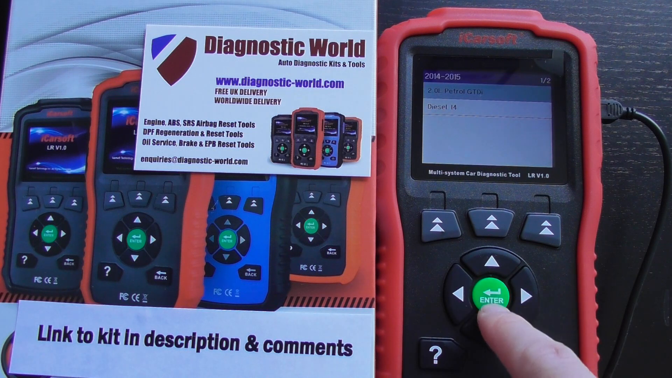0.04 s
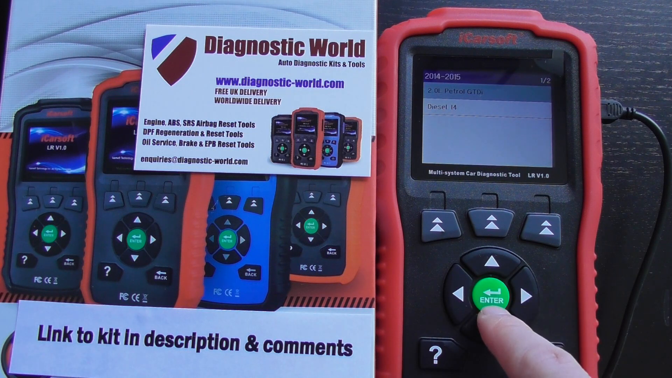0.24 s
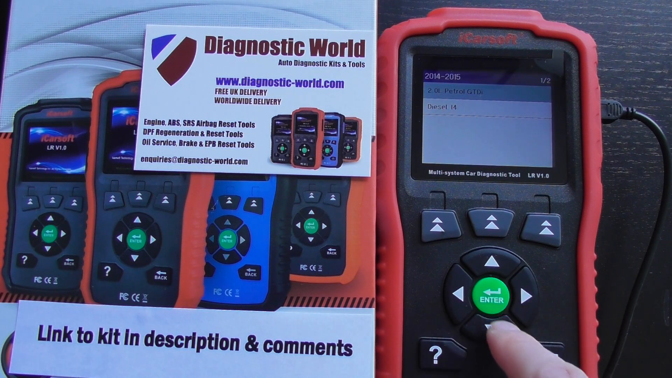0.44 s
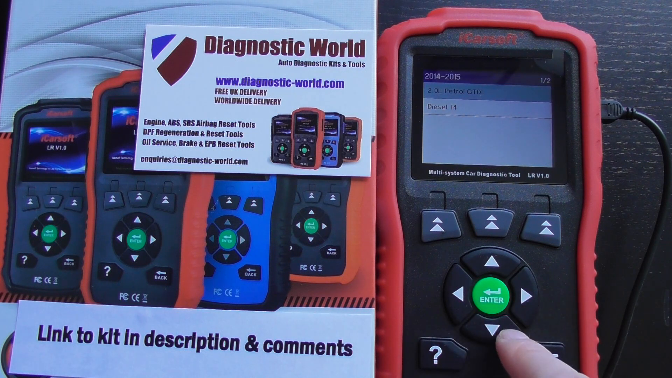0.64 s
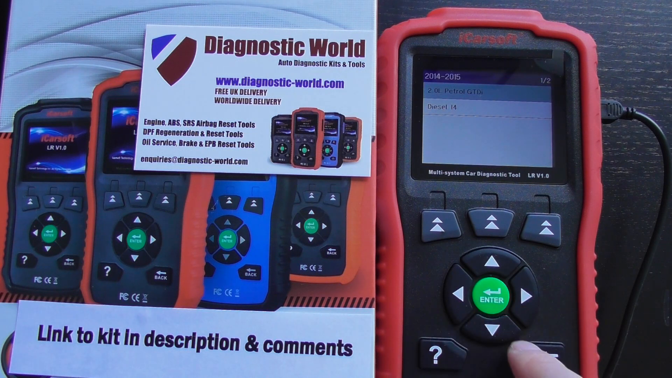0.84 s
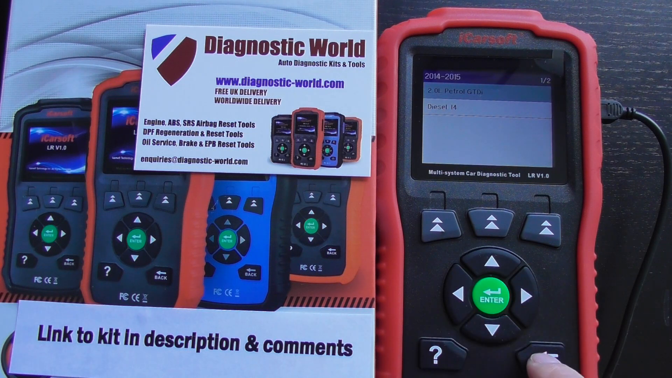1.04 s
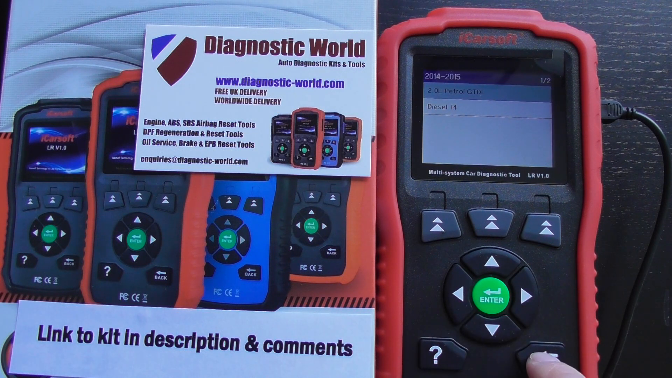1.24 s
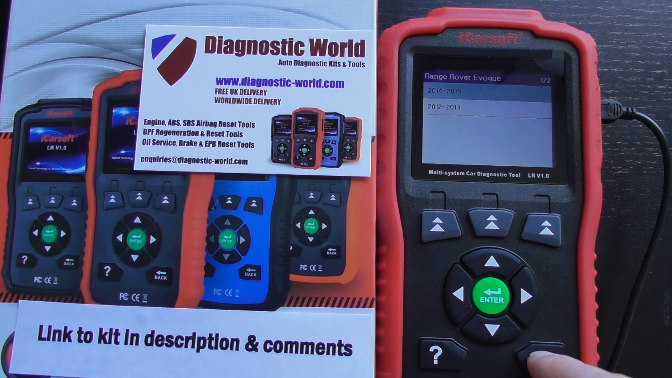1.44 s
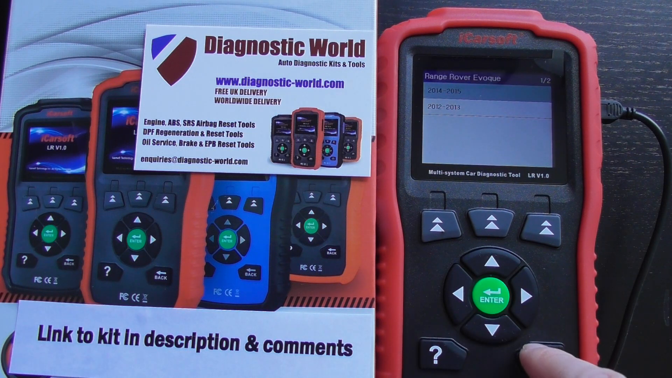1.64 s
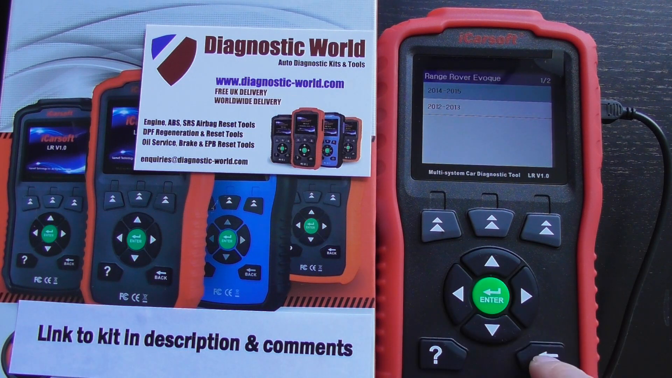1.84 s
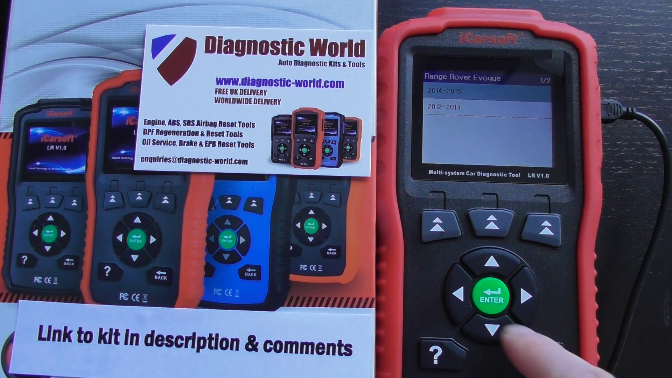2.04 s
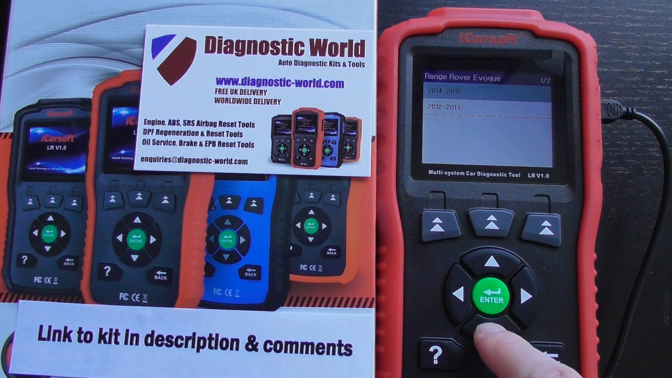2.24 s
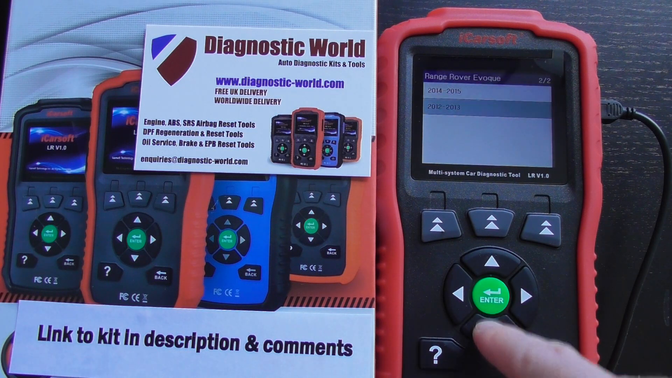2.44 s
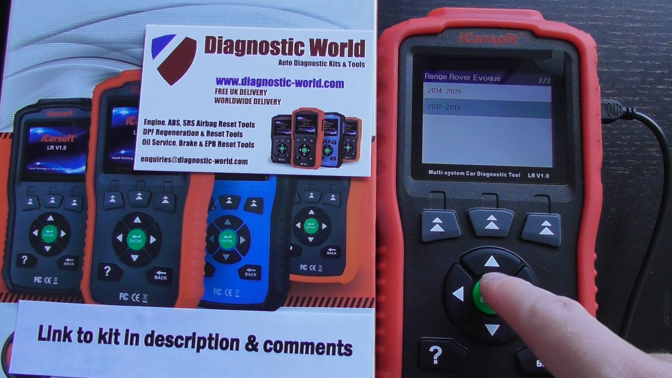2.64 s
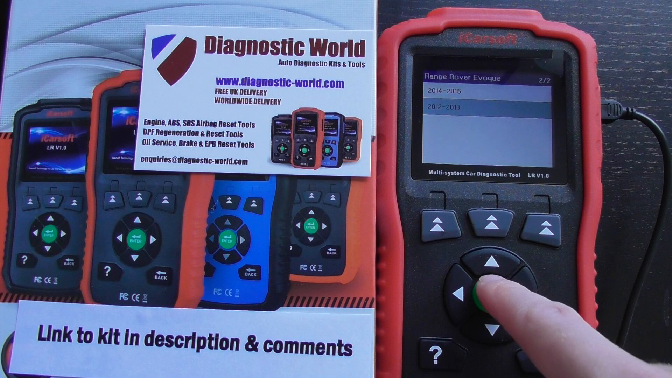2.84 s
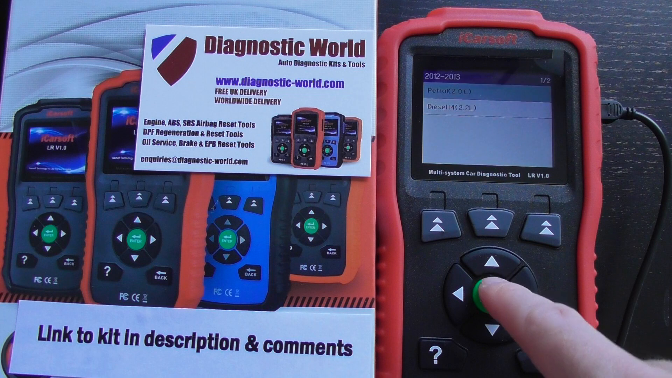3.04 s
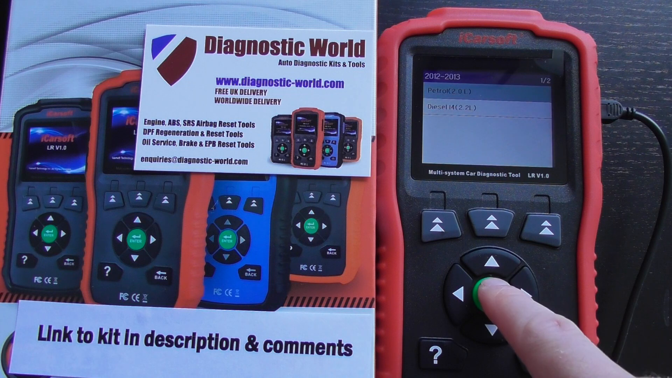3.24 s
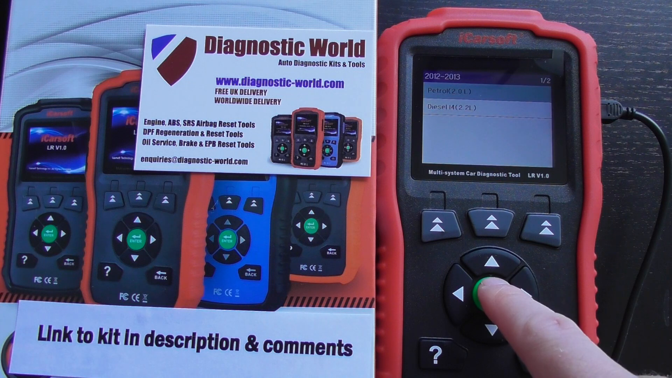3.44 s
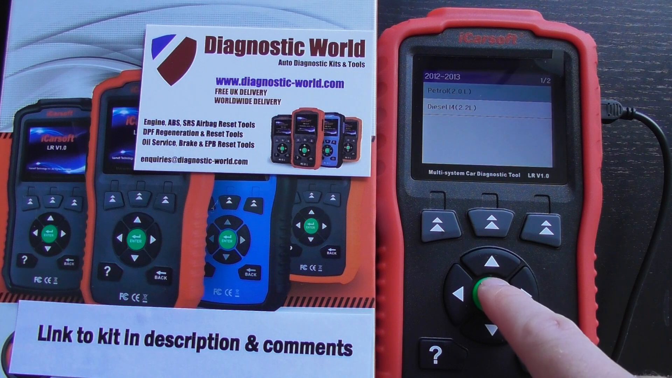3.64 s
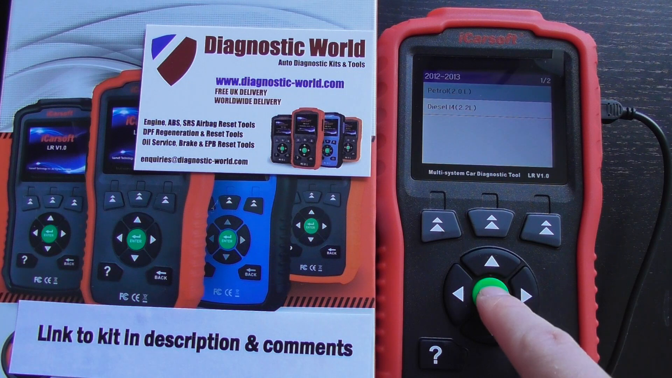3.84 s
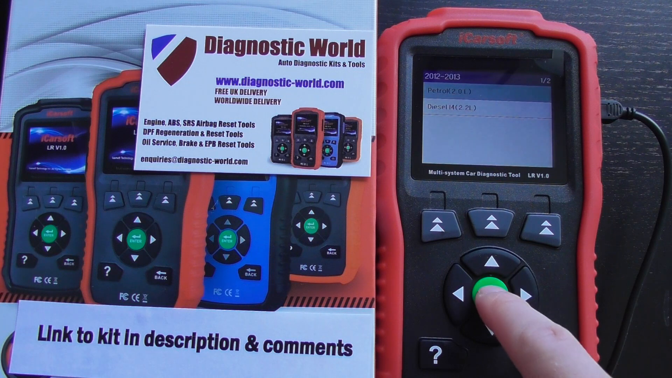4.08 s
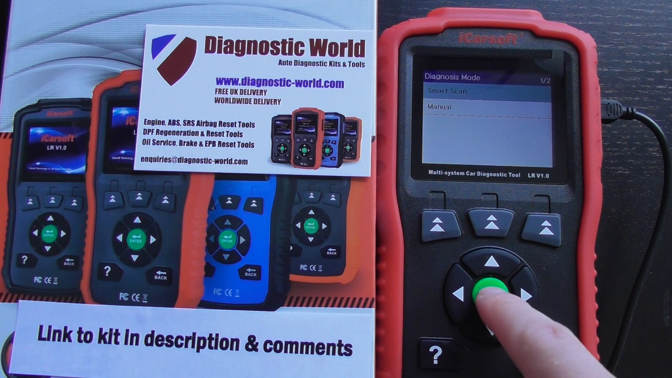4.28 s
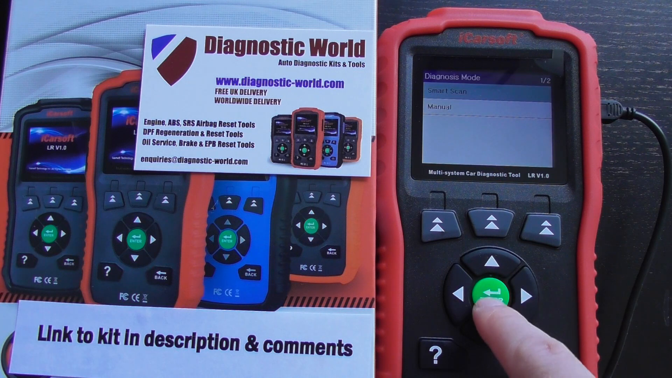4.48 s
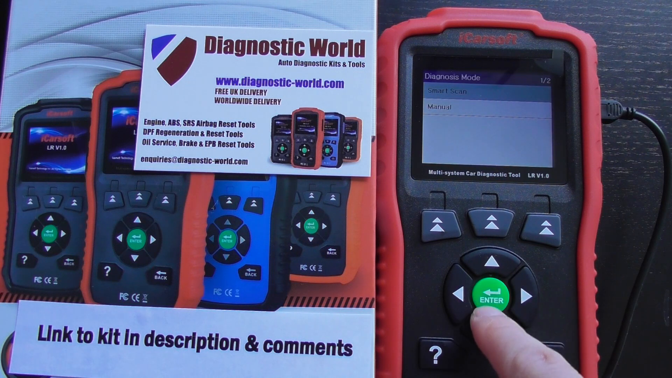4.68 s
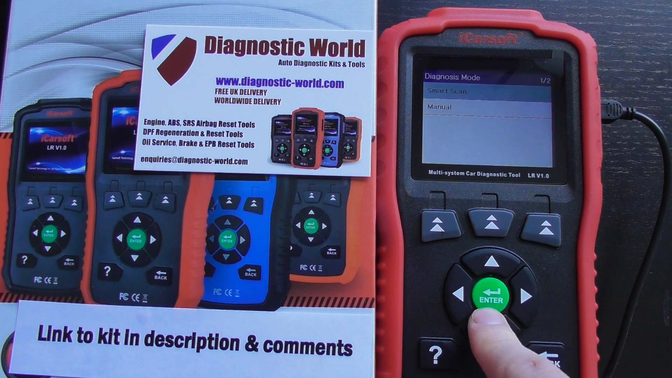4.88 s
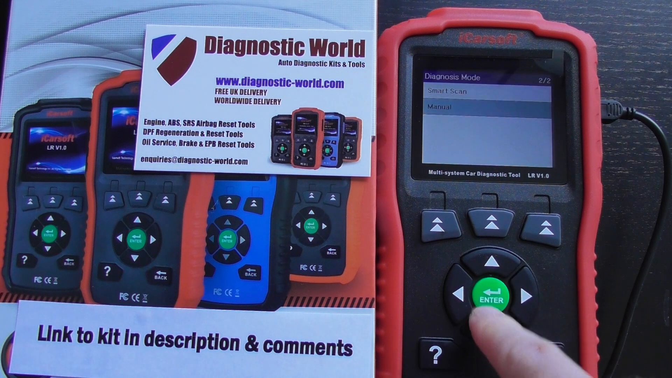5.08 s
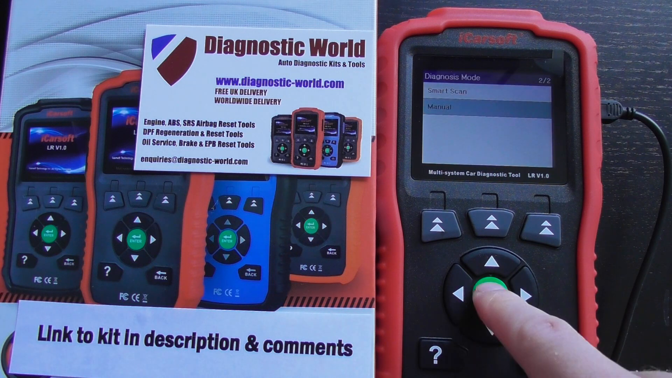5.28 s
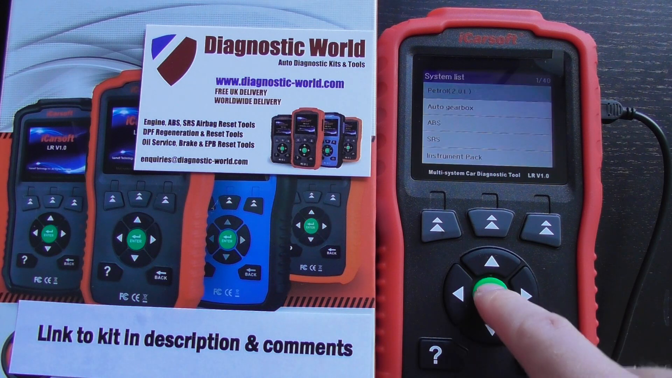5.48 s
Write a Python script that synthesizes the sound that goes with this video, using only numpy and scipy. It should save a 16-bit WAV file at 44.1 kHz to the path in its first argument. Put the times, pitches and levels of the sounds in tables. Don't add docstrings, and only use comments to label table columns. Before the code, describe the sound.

In a quiet small room, a finger clicks six keys on a plastic gadget at uneven intervals over hiss, rumble and intermittent motor whirr.

```python
import sys
import numpy as np
from scipy import signal
from scipy.fft import rfft, irfft, next_fast_len
from scipy.io import wavfile
from scipy.ndimage import uniform_filter1d

SR = 44100
rng = np.random.default_rng(int(sys.argv[2]) if len(sys.argv) > 2 else 0)


def magnitude_from_level(level_db):
    exponent = np.asarray(level_db, float) / 20
    return 10 ** exponent


def output_pcm(signal):
    pcm = np.clip(np.atleast_2d(signal).T, -1, 1) * 32767
    wavfile.write(sys.argv[1], SR, np.round(pcm).astype(np.int16))


N = 243431

# press_s, release_s, key
STROKES = [
    (1.34035, 1.48735, "corner"),
    (2.37598, 2.48068, "arrow"),
    (2.85258, 2.97478, "centre"),
    (4.07528, 4.20558, "centre"),
    (4.90918, 5.06578, "arrow"),
    (5.32708, 5.47628, "centre"),
]
# press_db, release_db
STROKE_FORCE = [(-.1, -0.8), (1.5, -0.14), (0, 1), (0.4, 1.2), (-1.3, -0.4), (0.3, 1.4)]
PRESS_LEVELS = {"corner": (-14.5, -28.5, -38, -27.5, -18), "arrow": (-13.5, -24, -30, -24, -20.5),
                "centre": (-5, -19.5, -29, -23.5, -15)}
RELEASE_LEVELS = {"corner": (-10, -27.5, -20, -23, -14.5), "arrow": (-10, -22, -23.5, -24, -17),
                  "centre": (-2.55, -20, -22.5, -24, -15)}
KEY_SEATS = {"corner": (1, -9, 0.13), "arrow": (-1.17, .1, -0.0093), "centre": (1, 1.5, .1)}
LATE_REBOUND = {"corner": (.0008, -12, 0.00021), "arrow": (.0011, -32, 0.00045),
                "centre": (.0008, -25, .0006)}
# pitch_hz, level_db, t60_s
DOME_MODES = [(6294, -3, 0.0011), (7340, 2.5, 0.0018), (8440, -6, 0.0015)]
# pitch_hz, level_db, t60_s
CAP_MODES = [(3370, 5, 0.0022), (3500, -11.5, 0.0014)]
# pitch_hz, level_db, t60_s
RIM_MODES = [(10020, 7.5, 0.002), (11380, 0.5, 0.0011), (12900, -6.5, 0.0043), (14400, -18.5, 0.001)]
# pitch_hz, level_db, t60_s
THUD_MODES = [(338.6, -9, .016), (567, 1, 0.0098)]
# pitch_hz, level_db, t60_s
CASE_MODES = [(138.3, -19.5, 0.22), (187.4, -17.5, 0.16), (251.6, -19.5, 0.1), (330.6, -13.5, 0.037),
              (470, -29, 0.017), (554.5, -11, 0.099), (662, -2.5, 0.017), (776, -16, 0.11),
              (863, -19, 0.031)]
# pitch_hz, level_db, t60_s
SHELL_MODES = [(811, 8, 0.013)]
# pitch_hz, level_db, t60_s
LID_MODES = [(1076.5, 8.5, 0.0096), (1347, 6.5, 0.0053), (1555, -14.5, 0.02), (1946, 1.5, 0.0081),
             (2297, 0.5, 0.0046)]
# start_s, peak_db, lid_db, desk_db
TOUCHES = [(0.429, -74, 5, -8), (0.565, -60, 3, -1), (0.836, -55, -2, -15), (1.258, -66, 20, -22),
           (1.647, -52, -4, 6), (2.04, -43, -19, -16.5), (2.29, -41.5, -8, 4.5), (2.518, -52.5, -16, 19),
           (2.77, -45, -12, 0), (3.234, -60.5, -4, 4), (3.402, -57, 9, -5), (5.157, -53.5, -16, 14.5),
           (5.253, -39.5, -14, 3.5)]
# pitch_hz, t60_s
ROOM_DECAY = [(100, .36), (500, 0.17), (2000, 0.3), (5000, 0.28), (8000, 0.31), (14000, 0.17)]
# pitch_hz, level_db
ROOM_LEVEL = [(100, -4.5), (500, -6), (1500, -13), (3500, -18), (5000, -16), (7000, -20.5), (10000, -23.5),
              (14000, -14)]
# pitch_hz, likeness (0-1)
ROOM_ALIKE = [(60, .5), (300, .85), (1400, .85), (2500, .99), (6500, .99), (9000, .8), (14000, .3)]
# pitch_hz, left_minus_right_db
DEVICE_LEAN = [(100, -4), (250, -6.5), (400, -6), (700, -3.8), (1290, -1), (2400, 0), (6000, -.3),
               (8500, -3), (14000, -2)]
# pitch_hz, left_lead_radians
DEVICE_LEAD = [(100, .1), (500, .3), (950, .4), (2500, 0), (10000, -.1), (12000, 1.7), (14000, 1.2)]
# pitch_hz, width_hz, depth (0-1)
HOUSING_DIPS = [(2697, 1250, 0.65), (4920, 300, 0.43), (16500, 5300, 0)]
# start_s, end_s, first_db, last_db
MOTOR_BUZZ = [
    (1.845, 2.354, -65, -66),
    (2.352, 2.75, -66.5, -69.5),
    (2.79, 3.08, -69, -89),
    (4.797, 5.156, -66, -67),
    (5.208, 5.523, -65, -76),
]
# start_s, end_s, level_db
MOTOR_WHISTLE = [
    (1.85, 2.4, -93),
    (2.75, 2.815, -75.5),
    (2.833, 2.962, -74),
    (4.728, 4.796, -77),
    (5.152, 5.214, -72.5),
    (5.36, 5.5, -83),
]
# pitch_hz, width_hz, level_db
BARREL_MODES = [(5870, 270, -5), (6770, 760, -2), (7630, 310, 4), (8670, 300, -3)]
# pitch_hz, level_db (per Hz)
RUMBLE_SPECTRUM = [(12, -61.5), (20, -27.5), (86, -9), (143, -10.5), (206, -6), (347, -13.5), (536, -12.5),
                   (769, -19), (1370, -26), (1500, -34.5), (1950, -46.5), (3300, -120)]
# pitch_hz, level_db (per Hz)
HISS_SPECTRUM = [(880, -45), (1500, -3), (1690, -10.5), (1770, 0), (1990, -1), (2870, -16.5), (3230, -9),
                 (4330, -12.5), (4970, -22.5), (5490, -13.5), (6610, -8.5), (7510, 4), (8970, -4.5),
                 (12800, -3.5), (15700, -5.5)]
# pitch_hz, likeness (0-1)
FLOOR_ALIKE = [(60, .1), (300, .2), (640, 0), (1400, .5), (2500, .93), (6000, .95), (7500, .8), (9000, .3),
               (15000, .1)]
# pitch_hz, left_minus_right_db
FLOOR_LEAN = [(60, -4.5), (240, -4), (950, 0.5), (3770, 0.5), (15000, 0)]
# pitch_hz, width_hz, level_db
DRONE_HUMS = [(50.6, 5, -83), (94.3, 6.5, -81), (196.8, 15, -72.5), (277.7, 21, -77.5)]


def along(points, hz):
    point_hz, values = np.transpose(points)
    return np.interp(np.log(hz + 1), np.log(point_hz + 1), values)


def unit(x):
    return x / np.sqrt(np.mean(x ** 2) + 1e-20)


def filtered(x, response):
    size = next_fast_len(N + SR // 2)
    hz = np.fft.rfftfreq(size, 1 / SR)
    return irfft(rfft(x, size) * response(hz), size)[..., :N]


def resonance(hz, centre_hz, width_hz):
    loss = 1j * hz * width_hz
    return loss / (centre_hz ** 2 - hz ** 2 + loss)


def add(track, start_s, sound):
    part = track[..., round(start_s * SR):][..., :sound.shape[-1]]
    part += sound[..., :part.shape[-1]]


def late(sound, delay_s):
    return np.roll(sound, round(delay_s * SR))


def ring(modes, attack_s, scatter_db, sense=1):
    t = np.arange(SR // 3) / SR
    out = np.zeros(len(t))
    for k, (pitch_hz, level_db, t60_s) in enumerate(modes):
        decay_db = level_db + scatter_db * rng.standard_normal() - 60 * t / t60_s
        out += sense ** k * magnitude_from_level(decay_db) * np.sin(2 * np.pi * pitch_hz * t)
    return out * (1 - np.exp(-(t / attack_s) ** 2))


def snap(levels, key, strength_db, rebound_db):
    dome_db, case_db, shell_db, lid_db, cap_db = levels
    cap_sense, upper_lid_db, rim_db = KEY_SEATS[key]
    late_delay_s, late_rebound_db, case_delay_s = LATE_REBOUND[key]

    tick = magnitude_from_level(dome_db) * ring(DOME_MODES, 0.0001, 1.0, -0.97)
    tick = tick + cap_sense * magnitude_from_level(cap_db) * ring(CAP_MODES, 0.00008, 0.18, -0.79)
    rim_level_db = -20.5 + rim_db + 0.51 * dome_db
    tick = tick + magnitude_from_level(rim_level_db) * ring(RIM_MODES, 0.00008, 1.2, -1.27)
    rebound = magnitude_from_level(rebound_db) * late(tick, 0.00042)
    late_rebound = magnitude_from_level(late_rebound_db) * late(tick, late_delay_s)

    knock = magnitude_from_level(16) * ring(THUD_MODES, 0.0016, 0.23) + magnitude_from_level(-3) * ring(CASE_MODES, 0.0014, 4.5)
    shell = magnitude_from_level(shell_db) * ring(SHELL_MODES, 0.0028, 1.0)
    body = late(magnitude_from_level(case_db) * knock - shell, case_delay_s)

    lid = ring(LID_MODES[:1], 0.00084, 0.8) + magnitude_from_level(upper_lid_db) * ring(LID_MODES[1:], 0.00076, 1.0)
    lid = late(magnitude_from_level(lid_db) * lid, case_delay_s + 0.00018)
    return magnitude_from_level(strength_db) * (body + lid + tick + rebound + late_rebound)


def keys():
    out = np.zeros((2, N))
    for (press_s, release_s, key), (press_db, release_db) in zip(STROKES, STROKE_FORCE):
        press = -snap(PRESS_LEVELS[key], key, press_db, rebound_db=-18.5)
        release = snap(RELEASE_LEVELS[key], key, release_db, rebound_db=-21)
        for start_s, sound in ((press_s, press), (release_s, release)):
            add(out, start_s, sound)
            add(out, start_s, room(sound))
    return out


def finger():
    out = np.zeros((2, N))
    for start_s, peak_db, lid_db, desk_db in TOUCHES:
        thud = magnitude_from_level(10.5) * ring(THUD_MODES, 0.0028, 3.3, -0.47)
        case = magnitude_from_level(0.5) * ring(CASE_MODES[4:6], 0.0026, 2.3)
        desk = magnitude_from_level(desk_db + 7.5) * ring(CASE_MODES[:4], 0.0047, 1.2)
        lid = magnitude_from_level(lid_db - 7) * ring(LID_MODES[:2], 0.0013, 1.6)
        sound = magnitude_from_level(peak_db + 3.5) * (thud + case + desk + lid)
        add(out, start_s, sound)
        add(out, start_s, room(sound))
    return out


def room(sound):
    hz, t, z = signal.stft(rng.standard_normal((2, SR // 2)), SR, nperseg=128)
    z = z * magnitude_from_level(-60 * t / along(ROOM_DECAY, hz)[:, None])
    z = z / np.sqrt(np.sum(abs(z) ** 2, axis=2, keepdims=True))
    energy = np.linalg.norm(signal.istft(z[0], SR, nperseg=128)[1])
    angle = np.arccos(along(ROOM_ALIKE, hz))[:, None] / 2
    mid, side = z[0] * np.cos(angle), z[1] * np.sin(angle)
    pair = np.array([mid + side, mid - side]) * magnitude_from_level(along(ROOM_LEVEL, hz))[:, None]
    tail = signal.istft(pair, SR, nperseg=128)[1]
    delayed = np.pad(sound[:SR // 8], (90, 0))
    return signal.fftconvolve(delayed[None], tail / energy, axes=1)


def lens_motor():
    t = np.arange(N) / SR
    step_hz, whistle_hz = 302, 5776
    when_s = np.arange(int(N / SR * step_hz)) / step_hz
    chance = rng.standard_normal((len(when_s), 2))
    jittered_s = when_s + 0.00001 * chance[:, 0]
    index = np.clip(np.round(jittered_s * SR).astype(int), 0, N - 1)
    step_db = -8.5 * (np.arange(len(when_s)) % 2) - chance[:, 1]
    steps = np.bincount(index, magnitude_from_level(step_db), N)

    def barrel(hz):
        total = 0
        for centre_hz, width_hz, level_db in BARREL_MODES:
            sign = -1 if 7100 < centre_hz < 7900 else 1
            total = total + sign * magnitude_from_level(level_db) * resonance(hz, centre_hz, width_hz)
        return total ** 2

    def gate(start_s, end_s):
        return np.clip(np.minimum(t - start_s, end_s - t) / 0.008, 0, 1)

    rattle = unit(filtered(unit(steps) + rng.standard_normal(N), barrel))
    buzz = np.zeros(N)
    for start_s, end_s, first_db, last_db in MOTOR_BUZZ:
        buzz += gate(start_s, end_s + 0.012) * magnitude_from_level(np.interp(t, [start_s, end_s], [first_db, last_db]))
    whistle = sum(gate(start_s, end_s) * magnitude_from_level(level_db) for start_s, end_s, level_db in MOTOR_WHISTLE)
    phase = 2 * np.pi * whistle_hz * t
    tone = np.sqrt(2) * (np.sin(phase) + magnitude_from_level(-10) * np.sin(2 * phase))
    return (buzz * rattle + whistle * tone) * magnitude_from_level([[-0.6], [0.6]])


def rush(spectrum, patchy_db):
    z = signal.stft(rng.standard_normal((2, N)), nperseg=1024)[2]
    field = uniform_filter1d(rng.standard_normal(z.shape[1:]), size=3, axis=0)
    field = uniform_filter1d(field, size=8, axis=1)
    pair = signal.istft(z * magnitude_from_level(patchy_db * unit(field)), nperseg=1024)[1][:, :N]

    def mid_side(hz):
        angle = np.arccos(np.clip(along(FLOOR_ALIKE, hz), -1, 1)) / 2
        return magnitude_from_level(along(spectrum, hz)) * [np.cos(angle), np.sin(angle)]

    def lean(hz):
        return magnitude_from_level(np.outer([0.5, -0.5], along(FLOOR_LEAN, hz)))

    mid, side = filtered(pair, mid_side)
    return unit(filtered(np.array([mid + side, mid - side]), lean))


def hum(centre_hz, width_hz):
    noise = rng.standard_normal((2, N))
    return unit(filtered(noise, lambda hz: np.exp(-((hz - centre_hz) / width_hz) ** 2)))


def floor():
    rumble = magnitude_from_level(-66) * rush(RUMBLE_SPECTRUM, patchy_db=3.0)
    hiss = magnitude_from_level(-68.5) * rush(HISS_SPECTRUM, patchy_db=0.1)
    drone = sum(magnitude_from_level(level_db + 5) * hum(centre_hz, width_hz) for centre_hz, width_hz, level_db in DRONE_HUMS)
    return filtered(rumble + hiss + drone, lambda hz: hz < 15900)


def microphone(hz):
    difference = along(DEVICE_LEAN, hz) * np.log(10) / 20 + 1j * along(DEVICE_LEAD, hz)
    ports = np.exp(np.outer([0.5, -0.5], difference))
    bass_cut = (1j * hz / (107.3 + 1j * hz)) ** 4
    dips = 1
    for centre_hz, width_hz, depth in HOUSING_DIPS:
        dips = dips * (1 - np.clip(depth, 0, 1) * resonance(hz, centre_hz, width_hz))
    return ports * bass_cut * dips


def scene():
    device = filtered(keys() + finger(), microphone)
    return device + lens_motor() + floor()


def band_limit(x):
    return signal.sosfilt(signal.butter(12, 17000, fs=SR, output="sos"), x)


def record(dry):
    heard = filtered(dry, lambda hz: 1 / (1 + (hz / 16400) ** 60))
    return band_limit(heard)


dry = scene()
out = record(dry)
output_pcm(out)
```